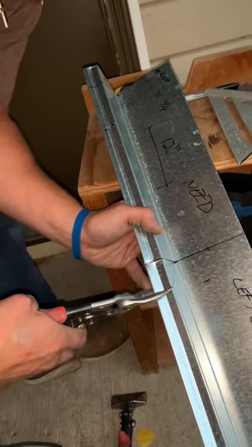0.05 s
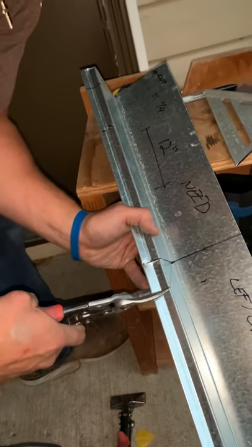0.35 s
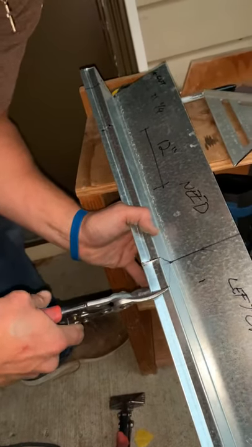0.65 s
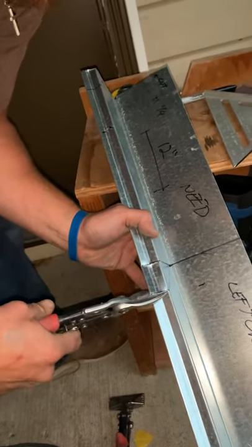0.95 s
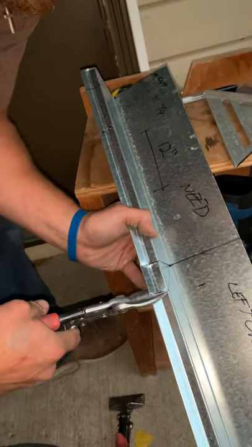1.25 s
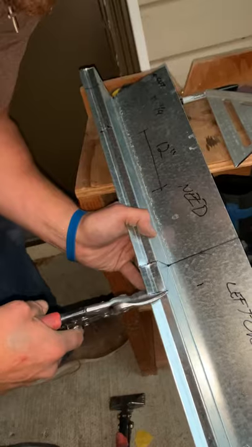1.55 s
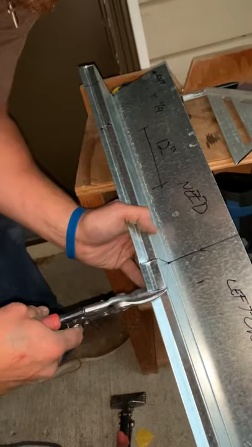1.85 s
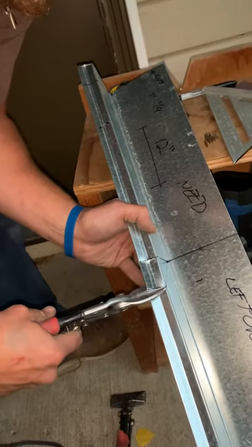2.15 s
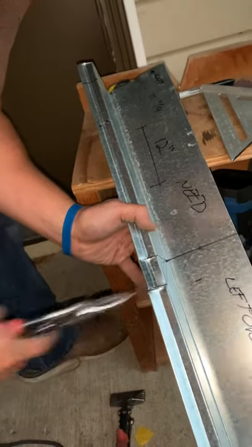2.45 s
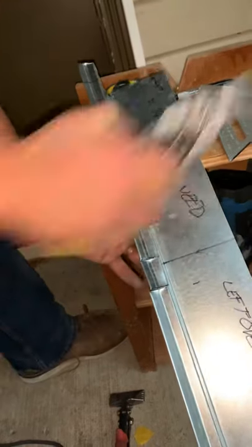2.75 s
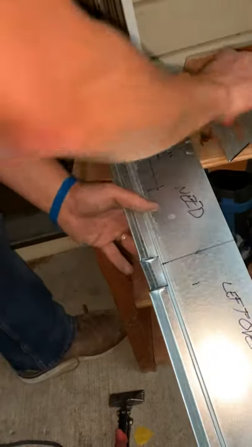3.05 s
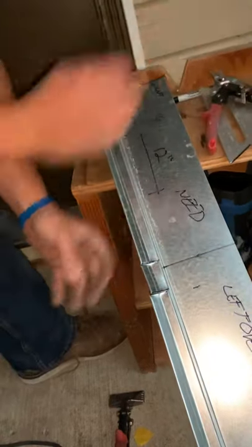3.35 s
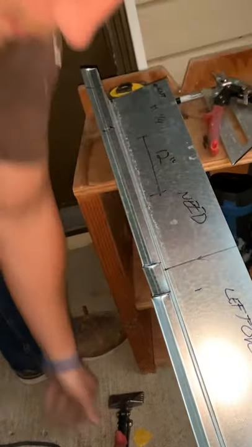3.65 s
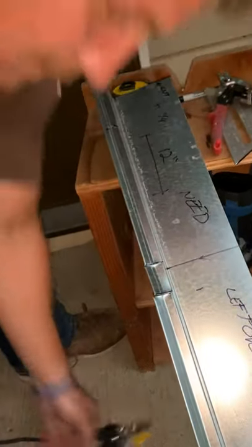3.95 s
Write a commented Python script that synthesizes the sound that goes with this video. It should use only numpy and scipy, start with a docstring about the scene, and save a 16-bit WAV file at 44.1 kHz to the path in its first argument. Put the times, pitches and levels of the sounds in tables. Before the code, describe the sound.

Hand snips cut thin sheet metal close by, with a sharp snap at 0.6 seconds, a scrape near 0.9, a crunching bite around 1.5, and another snap and scrape at 2.2 and 2.4, each ringing briefly. At 3.1 seconds the tool drops on a wooden bench with a loud clunk and short rattle. Sleeves then rustle, with a light tick near 3.8, over a faint outdoor rumble.

```python
"""Hand snips bite into steel flashing that lies across a wooden bench, close to a phone.
Each bite or scrape is a burst of tiny slips that excites the modes of sheet and jaws; the jaws tick
in between. The tool is then dropped: the impact drives the low modes of the bench and rattles the sheet.
Sleeves rustle over a low outdoor rumble."""
import sys
import numpy as np
from scipy import signal
from scipy.fft import rfft, irfft, next_fast_len
from scipy.io import wavfile
from scipy.ndimage import uniform_filter1d

SR = 44100
rng = np.random.default_rng(int(sys.argv[2]) if len(sys.argv) > 2 else 0)


def store_pcm(level_fs):
    """Save levels as 16-bit WAV."""
    pcm = np.round(np.clip(level_fs, -1, 1) * 32767).astype(np.int16)
    wavfile.write(sys.argv[1], SR, np.atleast_2d(pcm).T)


N = 176400
T = np.arange(int(1.5 * SR)) / SR  # time axis of one event
SPREAD = .36  # side-to-mid ratio of the noise in the ring and the sleeves
ATTACK_S = .0005  # rise time constant of a tick or knock
# The six frequencies in Hz at which the spectrum of a contact is set.
BAND_CENTRES_HZ = [250, 700, 1600, 3500, 6300, 12000]


def amp(db):
    """Amplitude ratio from decibels."""
    return 10 ** (np.asarray(db) / 20)


def unit(x):
    """Normalisation to unit energy."""
    return x / np.sqrt(np.sum(x ** 2, -1, keepdims=True) + 1e-20)


def read(points, hz):
    """Interpolation on a log-frequency axis."""
    freqs, values = np.transpose(points)
    return np.interp(np.log(hz + 1), np.log(freqs + 1), values)


def add(mix, start_s, sound):
    """Superposition of a sound on the mix."""
    part = mix[:, max(round(start_s * SR), 0):][:, :sound.shape[-1]]
    part += sound[..., :part.shape[1]]


def colour(x, *curves, size=4096):
    """Minimum-phase filtering by the sum of (Hz, dB) curves."""
    hz = abs(np.fft.fftfreq(size, 1 / SR))
    log_gain = np.log(amp(sum(read(curve, hz) for curve in curves)))
    taps = np.fft.ifft(np.exp(np.conj(signal.hilbert(log_gain)))).real[:size // 2]
    return signal.fftconvolve(x, taps[None], axes=1)[:, :x.shape[1]]


def noise(count, spread):
    """Partial coherence: two ports share white noise and differ in the midrange."""
    mid, side = rng.standard_normal((2, count))
    side = signal.sosfilt(signal.butter(2, (230, 2600), "band", fs=SR, output="sos"), side)
    return np.array([mid + spread * side, mid - spread * side])


def background():
    """Broadband noise: sleeve friction and outdoor rumble, the rumble briefly turned down
    by the phone's wind-noise suppression after the first bite."""
    # Outdoor spectrum. Each row: frequency in Hz, relative level in dB.
    air_spectrum = [(18, -51), (40, -10), (65, -1), (154, -7.5), (499, -19), (698, -23), (759, -20),
                    (873, -16.5), (3630, -43.5), (4810, -56), (16000, -66)]
    # Rubbing cloth. Each row: frequency in Hz, relative level in dB.
    cloth_spectrum = [(200, 16), (1500, 11), (3000, 2.5), (6500, 0), (9000, -9), (16000, -15)]
    # Sleeves brush as the arms move. Each row: time in seconds, level in dB.
    sleeve_levels = [(0, -53.5), (.13, -48.5), (0.351, -60.5), (2.6, -57.5), (2.931, -51), (3.059, -51),
                     (3.45, -37), (3.7, -42.5), (3.798, -39), (4, -46.5)]
    t = np.arange(N) / SR
    shared = noise(N, 0)
    opposed = rng.standard_normal(N) * np.array([[1], [-1]])
    opposed = colour(opposed, [(150, -46.0), (400, -1), (1500, 9)])
    air = unit(colour(shared + 0.28 * opposed, air_spectrum)) * amp(-41)
    rumble = signal.sosfiltfilt(signal.butter(2, BAND_CENTRES_HZ[0], fs=SR, output="sos"), air)
    suppression_db = -11.5 * np.exp(-((t - .77) / 0.087) ** 2)  # at a set time
    air += rumble * (amp(suppression_db) - 1)
    brushing = amp(np.interp(t, *np.transpose(sleeve_levels)))
    cloth = unit(colour(noise(N, SPREAD), cloth_spectrum)) * brushing
    return (air + cloth) * np.sqrt(N)


def ring(modes, scatter=True):
    """Free vibration: one damped sine per mode, at random phase if scattered."""
    return sum(amp(db - 60 * T / t60) * np.sin(2 * np.pi * (hz * T + scatter * rng.random()))
               for hz, db, t60 in modes)


def loose_ring(modes, waver=.6, knots_per_s=40):
    """Random modulation: modes of the loosely held sheet wander in amplitude and phase as they decay."""
    out = np.zeros(len(T))
    for hz, db, t60 in modes:
        knots = rng.standard_normal((2, 100))
        gain_drift, phase_drift = (waver * np.interp(T * knots_per_s, np.arange(100), k) for k in knots)
        envelope = amp(db - 60 * T / t60) * unit(1 + gain_drift) * np.sqrt(len(T))
        out += envelope * np.sin(2 * np.pi * (hz * T + rng.random()) + phase_drift)
    return out


def twangs(split=.055):
    """Beating: single modes of the flexed sheet swell and decay between two weaker neighbours."""
    # Each row: start in seconds, frequency in Hz, level in dB, swell and T60 in seconds.
    singing_modes = [(1.464, 2790, -27, .003, .28), (1.464, 275, -18, .004, .22),
                     (2.365, 963, -18.5, .015, .5), (3.38, 830, -20.5, .08, .7)]
    out = np.zeros((2, N))
    for start, hz, db, swell, t60 in singing_modes:
        neighbours = loose_ring([(hz * (1 + side * split), db, t60) for side in (-1, 1)])
        add(out, start, (1 - np.exp(-T / swell)) * (loose_ring([(hz, db, t60)]) + neighbours / 2))
    return out


def modal_coupling(width_hz=22, widening_hz=4000):
    """Modal coupling: each contact point excites the sheet's many close modes unevenly."""
    hz = np.fft.rfftfreq(len(T), 1 / SR)
    cluster_index = np.log1p(hz / widening_hz) * widening_hz / width_hz
    cluster_db = 3.2 * rng.uniform(-2.6, 3.4, SR // 8)
    return amp(np.interp(cluster_index, np.arange(SR // 8), cluster_db))


def dense_ring(clang_t60=0.17):
    """Frequency-dependent damping: a short clang and a long blur of modes and reflections."""
    # Decay of sheet and porch. Each row: frequency in Hz, T60 in seconds.
    decay_times = [(100, 0.51), (300, 1.15), (900, 0.81), (2000, 0.97), (4000, 0.62), (7000, 0.46),
                   (15000, 0.47)]
    wash = irfft(rfft(noise(len(T), SPREAD)) * modal_coupling(), len(T))
    clang = wash * amp(-60 * T / clang_t60)
    hz, t, spectra = signal.stft(wash[:, ::-1], SR, nperseg=256)
    decay = amp(-60 * t / read(decay_times, hz)[:, None])
    tail = signal.istft(spectra * decay, SR, nperseg=256)[1][:, :len(T)]
    return amp(-0.5) * unit(clang) + amp(-4.5) * unit(tail)


def strike(peak_s, rise_s, fall_s, band_db, sheet_db, steel_modes, steel_db):
    """Stick-slip excitation: a burst of slips rings sheet and tool. Returns start time and sound."""
    # Distinct modes of the flashing. Each row: frequency in Hz, relative level in dB, T60 in seconds.
    sheet_modes = [(210, -25.5, 0.98), (458.7, -30.5, 1.3), (776, -29, 1.2), (836, -29, 1.33),
                   (947, -34.5, 0.64), (1116, -37, 2.13), (1340, -35, 0.6), (1475, -26.5, 0.28),
                   (1946, -27.5, 0.53), (2090, -28.5, .4), (2784, -31, 1.2)]
    # Response of the sheet to any blow. Each row: frequency in Hz, gain in dB.
    sheet_response = [(30, -39.5), (100, -11.5), (170, 7), (270, 3.5), (600, -4.5), (1000, -2), (1900, -3),
                      (2450, -9), (2950, -2.5), (4000, -2), (4800, 2), (6200, -1.5), (8800, -8),
                      (11500, -6.5), (15200, -12.5)]
    strong_slips_per_s, slip_spread_db = 4000, 3.5
    lead = min(4 * rise_s, peak_s)
    push = np.exp(np.minimum((T - lead) / rise_s, (lead - T) / fall_s))
    sizes = amp(slip_spread_db * np.minimum(rng.exponential(1, len(T)), 3))
    signs = rng.choice([-1, 1], len(T))
    strong = rng.random(len(T)) < strong_slips_per_s / SR
    slips = unit(push * sizes * signs * (0.2 + strong))
    impulse_response = amp(sheet_db) * dense_ring()
    impulse_response[:, 0] += amp(-7)  # the direct crack
    sheet = signal.fftconvolve(impulse_response, slips[None], axes=1)[:, :len(T)] * np.sqrt(SR / 100)
    swell = np.cumsum(unit(push) ** 2)  # share of the energy delivered so far
    sheet += amp(sheet_db) * swell * loose_ring(sheet_modes)
    sheet = colour(sheet, sheet_response, list(zip(BAND_CENTRES_HZ, band_db)))
    steel = amp(steel_db) * swell * np.roll(ring(steel_modes), round(lead * SR))
    return peak_s - lead, sheet + steel


def dropped_tool():
    """Impact excitation: the tool thuds and rocks to rest while close low modes of the bench beat."""
    # Each row: time and fall in seconds, six band gains in dB, sheet ring and tool ring in dB.
    knocks = [(3.1169, 0.0045, 1.3, 5.1, -5, -0.5, -6.5, -9.5, -1.5, -3),
              (3.152, 0.013, -0.81, 2, -3, -10, -30, -24, 0, -25),
              (3.193, 0.0099, -1.9, -3, -5.5, -16, -14, -21.5, 5, -19),
              (3.232, 0.0068, 0, 1, -5, -8, -22.5, -21.5, -1, -21),
              (3.307, .012, 2, -1, -1, -11, -17, -30, -7, -40)]
    # The whole tool ringing free. Each row: frequency in Hz, relative level in dB, T60 in seconds.
    tool_modes = [(3935, -13, .28), (4382, -14, .3), (4760, -17, .2), (7030, -25, .25), (7600, -24, .25),
                  (8630, -18, .2)]
    # The loaded bench and sheet. Each row: frequency in Hz, relative level in dB, T60 in seconds.
    bench_modes = [(70, -29, .15), (130, -24, .12), (161, -19, .55), (188.5, -10.5, .58), (215, -19, .5),
                   (253, -21, .5), (284, -26, .45), (360, -31, .9)]
    out = np.zeros((2, N))
    for time, fall, *band_db, sheet_db, tool_db in knocks:
        add(out, *strike(time, ATTACK_S, fall, band_db, sheet_db, tool_modes, tool_db))
    # Dispersion: high bending waves travel faster, so the thud sweeps downward.
    top_hz, low_hz, sweep_s, thud_s = 1083, 181.8, .003, 0.011
    sweep_hz = low_hz + (top_hz - low_hz) * np.exp(-T / sweep_s)
    thud = T / thud_s * np.exp(1 - T / thud_s) * np.sin(2 * np.pi * np.cumsum(sweep_hz) / SR)
    add(out, knocks[0][0], amp(-3.5) * thud)
    boom = (1 - np.exp(-T / 0.0025)) * ring(bench_modes, scatter=False)
    add(out, 3.1285, amp(6.5) * boom)
    return out


def snaps(fall_s=.001, cutoff_hz=2200):
    """Impulsive radiation: steel gives way or meets steel with a very short, bright crack."""
    # Each row: start in seconds, relative level in dB.
    cracks = [(.297, -44.5), (0.482, -30), (.6305, -16.5), (.939, -35), (1.4517, -25), (2.1548, -17),
              (2.62, -28.5), (3.1164, -9.5), (3.841, -25)]
    highpass = signal.butter(2, cutoff_hz, "high", fs=SR, output="sos")
    out = np.zeros((2, N))
    for start, db in cracks:
        crack = signal.sosfilt(highpass, rng.standard_normal(len(T)) * np.exp(-T / fall_s))
        add(out, start, amp(db) * unit(crack) * np.sqrt(fall_s * SR))
    return out


def snips():
    """Shear and friction: the blades bite and drag on the flashing, with light ticks of contact."""
    # Each row: peak time, rise and fall in seconds, six band gains in dB, sheet ring and jaw ring in dB.
    cuts = [(0.628, 0.0061, 0.0035, -32, -6.5, -12.5, -2, -0.5, -30.5, -11, -11.5),
            (.632, 0.0011, 0.0055, -6.5, 3.5, 4, 3, 4.5, 1, -12.5, -32),
            (.945, 0.078, 0.042, -21, -11.5, -15, -26, -28.5, -36.5, 0.5, -52.5),
            (1.348, 0.015, 0.0095, -36.5, -11, -11.5, -22, -29, -36, -5, -60),
            (1.448, 0.00096, 0.033, -16.5, 8, 3, -7, -10, -18, -4.5, -43),
            (1.464, 0.00088, 0.012, 1, 0.5, 7.5, -9.5, -14, -7, -15.5, -19),
            (1.528, .006, 0.028, -9.5, -29, -9.5, -7, -14, -37, -17, -33),
            (1.635, 0.0008, 0.0086, -12, -9, -12.5, -25, -29, -30.5, -20.5, -50),
            (2.156, .002, 0.0094, 6, 9.5, 10, 2.5, -3.5, 2.5, -10.5, -35),
            (2.351, 0.0032, 0.023, -4, 2.5, 0.5, -8.5, -19.5, -15.5, -5.5, -29),
            (2.391, 0.018, 0.015, -9, -7, -5, -7, -13.5, -16, 0.5, -25)]
    # Steel touches steel. Each row: time in seconds, then body, treble and top gains in dB.
    ticks = [(0.4836, -19.5, -13, -16), (0.941, -37.5, -32.5, -30.5), (1.206, -25.5, -48, -53),
             (1.322, -25, -37, -38.5), (1.704, -53, -37, -40.5), (1.751, -48, -31.5, -61.5),
             (2.618, -27, -28.5, -39), (3.841, -49, -17.5, -17.5), (3.857, -62, -23, -31)]
    # The steel jaws. Each row: frequency in Hz, relative level in dB, T60 in seconds.
    jaw_modes = [(2900, -16, .1), (3825, -10, .13), (5960, -12, .13), (6236, -9, .16), (6556, -8, .19)]
    out = np.zeros((2, N))
    for time, rise, fall, *band_db, sheet_db, jaw_db in cuts:
        add(out, *strike(time, rise, fall, band_db, sheet_db, jaw_modes, jaw_db))
    for time, body, treble, top in ticks:
        band_db = [body, body, body, (body + treble) / 2, treble, top]
        add(out, *strike(time, ATTACK_S, fall_s=.0025, band_db=band_db, sheet_db=-7.5,
                         steel_modes=jaw_modes, steel_db=treble - 20))
    return out


def scene():
    """Superposition of all sources at the microphone."""
    return snips() + snaps() + dropped_tool() + twangs() + background()


def record(dry):
    """Phase and level differences of two spaced ports, then gentle compression and a band limit."""
    # Each row: frequency in Hz, lead of the left port in radians.
    port_phase = [(200, 0), (420, -.4), (700, .1), (1300, -.1), (1650, .5), (2250, 0), (2450, 1.8),
                  (3700, 1.8), (4700, 3.15), (5900, 4.8), (6400, 6.1), (7400, 6.35), (8400, 9.1),
                  (9450, 9.5), (10400, 12.4), (11500, 12.7), (12700, 15.6), (13700, 15.8), (14700, 18.6),
                  (16400, 19)]
    # Each row: frequency in Hz, left minus right level in dB.
    port_balance = [(100, 0.5), (300, 0), (700, -1.1), (1400, -1.5), (3000, -0.5), (6000, 0.3)]
    threshold_db, duck_share, release_db_per_s, edge_hz = -16, .28, 16, 16000
    size = next_fast_len(N + SR // 10)
    hz = np.fft.rfftfreq(size, 1 / SR)
    phase = np.interp(hz, *np.transpose(port_phase))
    tilt = amp(read(port_balance, hz) / 2)
    ports = irfft(rfft(dry, size) * np.array([tilt, np.exp(-1j * phase) / tilt]), size)[:, :N]
    power_db = 10 * np.log10(abs(uniform_filter1d((ports ** 2).mean(0), size=300)) + 1e-12)
    release = np.arange(N) * release_db_per_s / SR
    held_db = np.maximum.accumulate(power_db + release) - release
    over_db = np.maximum(held_db - threshold_db, 0)
    ducked = ports / amp(duck_share * uniform_filter1d(over_db, size=200))
    lowpass = signal.firwin(255, edge_hz, window=("kaiser", 9), fs=SR)
    return signal.oaconvolve(ducked, lowpass[None], "same")


dry = scene()
out = record(dry)
store_pcm(out)
```